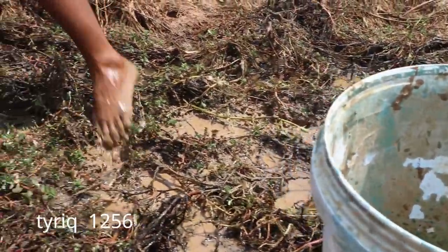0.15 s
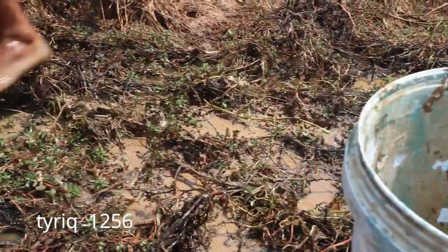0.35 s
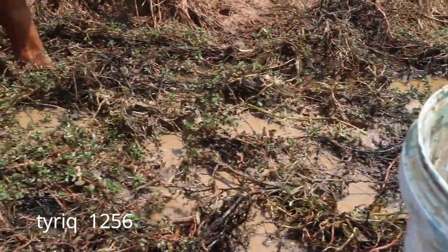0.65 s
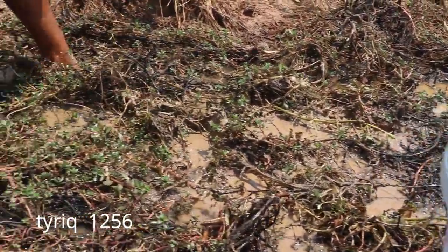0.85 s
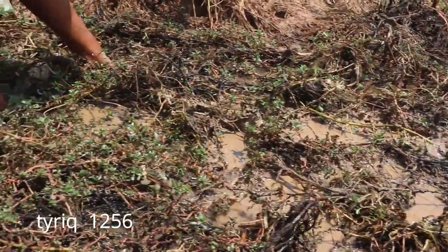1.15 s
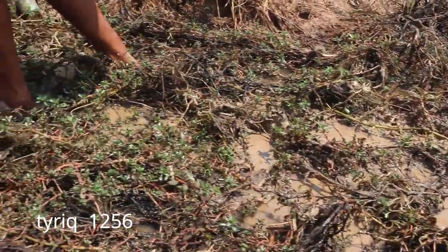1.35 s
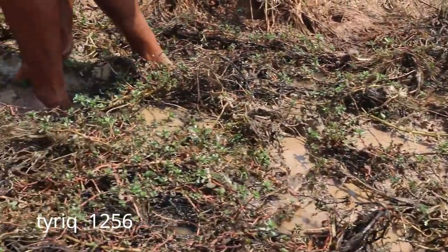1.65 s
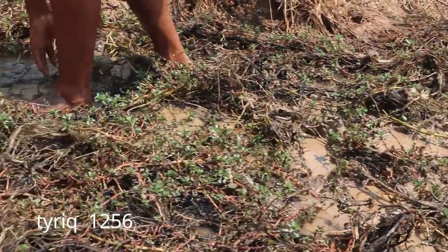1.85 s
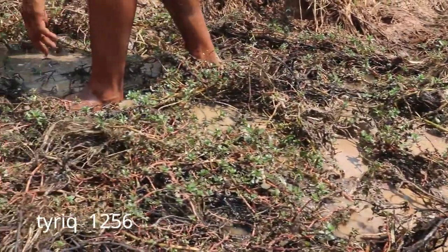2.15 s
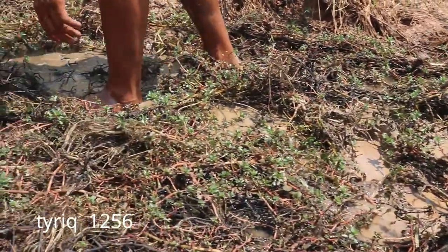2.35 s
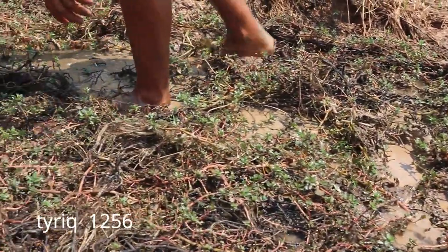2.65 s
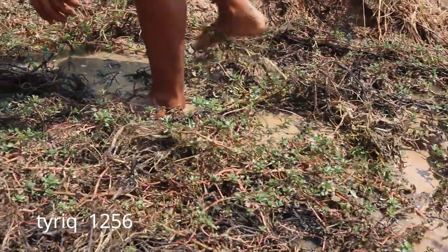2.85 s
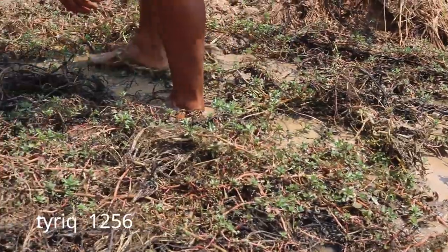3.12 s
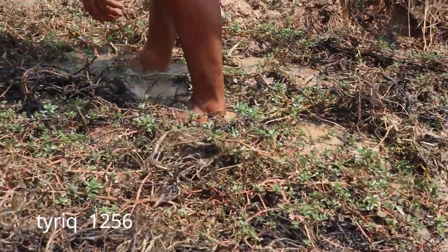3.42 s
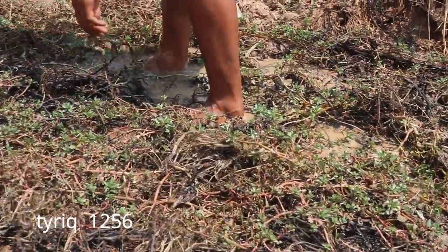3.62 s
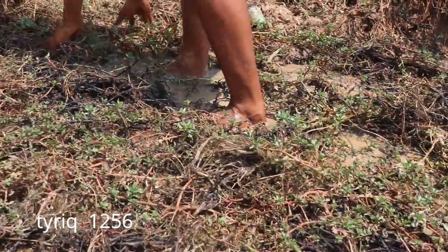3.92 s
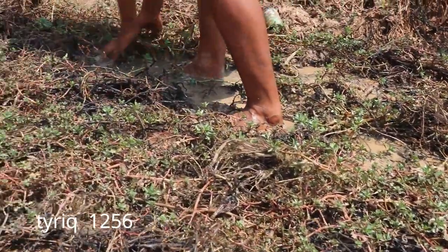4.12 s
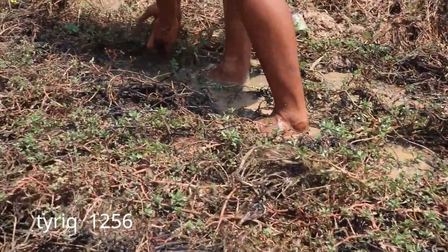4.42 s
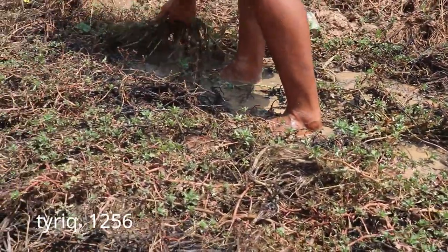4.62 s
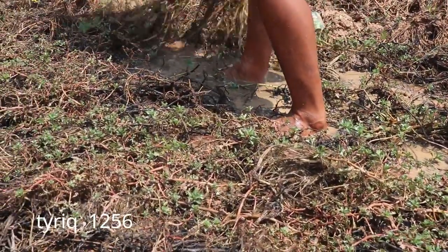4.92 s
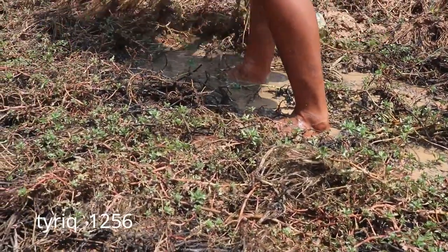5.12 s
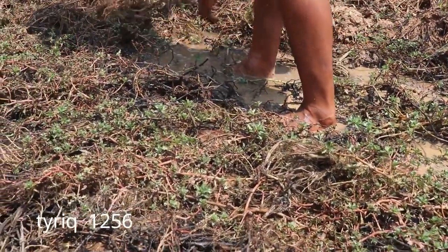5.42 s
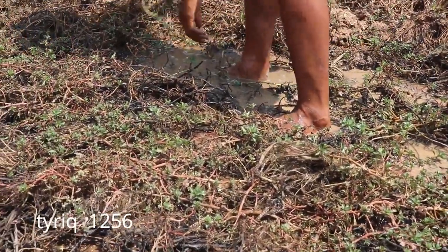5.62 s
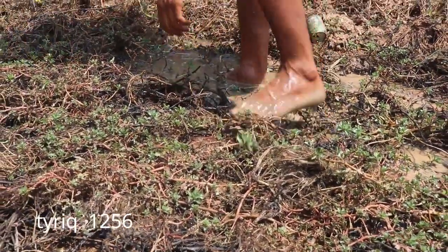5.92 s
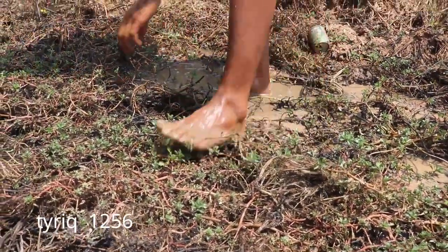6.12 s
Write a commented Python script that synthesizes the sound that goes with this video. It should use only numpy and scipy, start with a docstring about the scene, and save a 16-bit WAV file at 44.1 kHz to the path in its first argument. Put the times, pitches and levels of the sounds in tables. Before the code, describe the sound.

Bare feet wade through a shallow, weedy puddle in a field, close to the microphone. Each step crunches plants and sloshes water, with soft thuds in the mud and small gurgling bubbles. Past the middle, hands tear up weeds in a loud run of sharp cracks and rustling. A wet clump drops with a splat and one more step follows. Faint wind, hiss and distant insects lie underneath.

```python
"""Leaves rustle and water sloshes over faint wind, hiss and far insects as bare feet wade a weedy puddle.
Crushed weeds crunch, heels thud into the mud, and trapped air gurgles out as ringing bubbles.
Stems fracture in sharp cracks, loudest where hands tear them up; then a wet clump drops.
About two seconds in, wings buzz faintly for a moment."""
import sys
import numpy as np
from scipy import signal
from scipy.fft import rfft, irfft, next_fast_len
from scipy.io import wavfile
from scipy.ndimage import uniform_filter1d, map_coordinates

SR = 44100
rng = np.random.default_rng(int(sys.argv[2]) if len(sys.argv) > 2 else 0)


def store_pcm(level_fs):
    """Save levels as 16-bit WAV."""
    pcm = np.round(np.clip(level_fs, -1, 1) * 32767).astype(np.int16)
    wavfile.write(sys.argv[1], SR, np.atleast_2d(pcm).T)


N = 276507

# spectra of far hiss, wind and rubbed leaves: frequency_hz, density_db
HISS_SPECTRUM = [(180, -19), (300, -3), (399, -7), (441, -1), (479, -5.5), (1140, -9), (2090, -14),
                 (2730, 1.5), (3170, -13), (6290, -13), (16300, -24.5)]
WIND_SPECTRUM = [(12, -43), (20, -17), (49, -4.5), (88, -3), (114, -9.5), (161, -3.5), (500, -16),
                 (650, -28), (1100, -120)]
LEAF_SPECTRUM = [(710, -63), (1200, -46.5), (1560, -4.5), (1950, -4), (3080, -4.5), (4410, -2),
                 (10800, -9.5), (16000, -33)]
# left-right likeness of hiss and wind: frequency_hz, correlation (limited to -1..1 in use)
AIR_CORRELATION = [(60, 0.87), (180, 0.44), (550, 0.17), (1650, -1.22), (4970, -0.17), (15000, -0.16)]
# steady insect bands: pitch_hz, width_hz, first_db, last_db
INSECT_BANDS = [(2686, 130, -64, -68), (622, 197, -57, -67.5)]
# strength of the wind: time_s, level_db
WIND_LEVELS = [(0, -54), (.64, -53.5), (2.01, -57.5), (3.6, -57), (4.2, -57), (4.42, -60.5), (5.46, -61),
               (5.73, -55.5), (6.27, -56.5)]
# movements of a foot or hand: peak_s, rustle_db, slosh_db, swell_s, fade_s (both over 20 dB)
LIMB_MOVES = [(.02, -49.5, -48.5, 1, .3), (0.124, -38, -37, 0.12, 0.19), (.24, -48.5, -48.5, 0.3, .2),
              (.41, -53, -50, 0, 0), (.53, -46, -43, 0.07, .18), (.62, -41, -42, .06, .1),
              (.68, -47, -46, .05, .15), (.86, -44, -45.5, 0.22, 0.12), (.97, -52, -52.5, 0.2, .2),
              (1.16, -46.5, -48, 0.18, 0.23), (1.37, -43, -48.5, 0.14, 0.26), (1.56, -40, -40.5, 0.32, 0.4),
              (1.78, -51, -49.5, 0.1, 0.27), (2.62, -48, -48.5, 0.02, .5), (2.74, -45, -57, .2, .35),
              (2.739, -43.5, -31, .14, .045), (3.17, -44.5, -51, 0.17, 0.23), (3.31, -60, -52, .4, 0.3),
              (3.62, -63.5, -57, 0.5, .4), (4.05, -51.5, -65, .5, .1), (4.12, -39, -46, 0.06, .5),
              (4.24, -48, -40.5, .15, .25), (4.42, -47, -45.5, 0.28, 0.3), (4.53, -57, -38.5, 0.1, 0.07),
              (4.76, -36.5, -42.5, 0.13, 0.14), (4.86, -35, -51, 0.11, .12), (4.96, -34, -49, 0.1, .15),
              (5.31, -40.5, -56, 0.6, 0.06), (5.66, -44.5, -52, 0.2, .16), (5.815, -41, -29.5, 0.01, .028),
              (5.93, -51, -53, .25, 0.5), (6.27, -32.5, -43, 0.0662, .2)]
# weeds crushed by a foot or the clump: start_s, level_db, squelch_offset_db, pan_db, length_s, squelch_hz
WEED_CRUNCHES = [(0.045, -24.5, -11, -8.5, 0.022, 2700), (0.0974, -29.5, 4, -20, 0.039, 2370),
                 (0.123, -26, 9.5, -16, 0.0083, 3050), (0.144, -38, 7, -12, 0.012, 2520),
                 (0.1844, -15.5, -12, -2, 0.02, 1380), (0.399, -29, -3, -13, 0.017, 2800),
                 (0.411, -31.5, -4.5, -2, 0.019, 663), (0.521, -20.5, -8, -12.5, 0.024, 1570),
                 (0.55, -23, -8.5, -11, 0.015, 590), (0.6047, -14.5, -27, 12, 0.025, 1520),
                 (0.669, -20, -8, -8, 0.018, 650), (0.829, -31, 2, -21, 0.025, 1710),
                 (0.862, -23.5, -1.5, -14, 0.017, 1800), (1.111, -21, -15, 6.5, 0.018, 2060),
                 (1.142, -21, -15, 12, 0.04, 1620), (2.608, -26.5, 0, 3, 0.02, 2360),
                 (2.7327, -27, -22, -1, 0.01, 670), (2.766, -26, 2, 0.5, 0.0078, 2430),
                 (3.125, -22.5, -18, 3.5, 0.026, 3070), (3.1554, -21, -30, 6, 0.025, 2320),
                 (4.105, -22, -29, 14, 0.039, 1480), (5.798, -23.5, 6, -7, 0.024, 1520),
                 (5.805, -9, -3, 7, 0.013, 960), (5.814, -7.5, -7.5, 0.5, 0.018, 560),
                 (6.201, -23, -12, 1, 0.032, 3280), (6.233, -27, 2, -3, 0.056, 2030)]
# heels sinking into mud: start_s, level_db, pitch_hz
HEEL_THUDS = [(.063, -35, 218), (.123, -40, 156), (.194, -41, 207), (.403, -47, 140), (.541, -31.5, 208),
              (.815, -42.5, 164), (.991, -41, 223), (4.527, -46, 200), (5.801, -36.5, 128),
              (5.815, -33.5, 253)]
# large air pockets: start_s, level_db, pitch_hz, pan_db, t60_s
AIR_POCKETS = [(.123, -22, 3150, -16, 0.034), (.152, -24, 2620, -13, 0.046), (.164, -19.5, 910, -1, .029),
               (.196, -15.5, 1400, -.5, 0.025), (.501, -17, 3710, -21, 0.013), (.615, -18, 1510, .5, 0.033),
               (1.434, -35, 2240, 3, .04), (1.466, -31.5, 1280, -5, .054), (1.494, -29, 950, 2, .037),
               (1.507, -23, 1166, 6, .054), (1.534, -17.5, 1544, 10, .025), (1.544, -25, 1570, -10, .04),
               (1.591, -28.5, 784, 2, 0.083), (1.619, -22, 1220, 5, 0.033), (1.656, -24.5, 1320, 2, .042),
               (1.675, -24, 960, 4, .041), (1.711, -31, 1920, 0, .032), (1.744, -27, 1590, 3.5, 0.025),
               (1.776, -32, 1370, 0, .032), (2.636, -26.5, 447, -1, 0.045), (2.639, -21.5, 2400, -5, 0.044),
               (2.648, -29.5, 1180, -2, .071), (2.66, -36, 500, -2, .1), (2.677, -10.5, 1470, -2, .018),
               (2.697, -6, 1456, -4, .016), (2.709, -20, 635, 2, .019), (2.726, -19.5, 618, 2, 0.037),
               (2.739, -15.5, 626, 2.5, 0.044), (2.75, -25.5, 2300, -5, 0.075),
               (3.193, -23.5, 590, 1, 0.038), (3.217, -29.5, 1730, .5, .037), (3.27, -25.5, 572, 1, 0.078),
               (3.279, -30.5, 2720, 0, .04), (3.674, -37, 1074, .5, .04), (4.129, -28, 1900, -3, .035),
               (4.21, -31.5, 505, 0, 0.13), (4.228, -24, 950, 1, .03), (4.231, -24, 1600, 1, 0.038),
               (4.852, -21, 1800, -2, .03), (5.207, -28, 2610, -7, .043), (5.91, -28, 1800, -7, .055)]
# hollows filling with water: start_s, level_db, pitch_hz, pan_db, t60_s
FILLING_HOLLOWS = [(2.83, -34, 903, -4, 0.053), (3.288, -39, 646, 0, .32)]
# breaking stems and droplet ticks, thick wet stems lowest: start_s, level_db, pitch_hz, pan_db
STEM_SNAPS = [(.1881, -15.5, 3930, -6), (0.2971, -20, 4360, 5), (0.5023, -22.5, 6500, -10),
              (.556, -24.5, 2630, -15), (.597, -19.5, 8400, 14), (0.6732, -21.5, 2200, -10),
              (.8035, -29.5, 6960, -12.5), (0.8715, -22, 2260, -13), (.9737, -14.5, 3200, 8),
              (.9739, -22.5, 1400, 0), (1.1178, -21.5, 6640, 11), (1.1526, -19.5, 2150, 9),
              (1.1572, -23, 2150, 6), (1.306, -28, 3200, 3), (1.3449, -24, 4740, 8.5),
              (1.4136, -29.5, 6000, 10), (2.5861, -30, 9300, 7.5), (2.612, -18, 2540, -4),
              (2.7332, -5, 4130, 2), (2.767, -21.5, 5000, 2), (2.805, -28, 8660, 0), (2.818, -26, 4700, 0),
              (2.86, -30, 3320, -2), (2.8665, -26.5, 4600, 0), (3.1571, -25.5, 2710, -5),
              (3.1951, -27, 1520, -2), (3.4163, -30, 2970, -1), (3.471, -30.5, 6340, 4),
              (3.726, -30, 6200, 2), (4.0977, -24.5, 6540, 18), (4.11, -20.5, 4220, 9),
              (4.1324, -27, 7450, 11), (4.1392, -24, 4160, 13), (4.159, -24.5, 4860, 17),
              (4.193, -25, 4650, 10), (4.2285, -23.5, 5200, 16), (4.2872, -24, 4600, 4),
              (4.3762, -20.5, 2420, 1), (4.3766, -27, 900, 0), (4.4057, -24.5, 1900, -1),
              (4.437, -21, 6800, 1), (4.4533, -8, 6950, 1), (4.4535, -12.5, 1500, 0.5),
              (4.4829, -20, 4520, 0), (4.483, -27, 1300, 0), (4.4975, -22, 5300, 11),
              (4.518, -9.5, 2550, -2.5), (4.5182, -13, 1310, 0), (4.5282, 1.5, 4560, 1.5),
              (4.549, -5, 5800, 2.5), (4.592, -4, 3770, -.5), (4.5921, -19, 1430, -1.5),
              (4.651, -24.5, 3230, 0), (4.7119, 0, 4720, 3.5), (4.7315, -5, 6200, 5.5),
              (4.7432, -10, 5760, 0), (4.7514, -20, 4180, 2), (4.7615, -3, 6100, 3),
              (4.7765, -13.5, 4960, 4), (4.79, -22, 4350, 0), (4.8076, -1.5, 6640, 1.5),
              (4.834, 0, 6900, 11.5), (4.8513, -7, 2390, -1), (4.8558, -5, 5800, 1),
              (4.8727, -2.5, 5540, 2), (4.8878, -11.5, 5000, -1), (4.9111, -12, 6330, 9.5),
              (4.9203, -16, 6930, 0), (4.9357, 2, 5100, 1.5), (4.9453, -21, 2630, -6), (4.9495, 3, 6130, 2),
              (4.9541, -12, 5940, 2), (4.9602, -13, 5810, 2), (4.9777, -8, 5000, 2), (4.9848, -7, 4900, 5),
              (4.9951, -13.5, 4160, 1), (5.0106, -15.5, 9220, 10), (5.0157, -17, 5730, 3),
              (5.054, 0, 7750, 9), (5.0655, -1, 5300, 4), (5.0882, -12, 6430, -3), (5.106, -15.5, 10300, 9),
              (5.1529, -6.5, 7100, 9.5), (5.1933, -21, 7240, 9.5), (5.2155, -6.5, 8700, 7),
              (5.2347, -1, 5540, 2.5), (5.2653, -5.5, 7550, 3), (5.638, -29, 2600, 0),
              (5.672, -33, 1400, 0), (5.704, -25.5, 8100, 8.5), (5.807, -8, 3700, -1),
              (5.8072, -12.5, 980, 0), (5.827, -15.5, 2450, -5.5), (5.9122, -24.5, 2350, -4.5),
              (5.9311, -19.5, 3800, 1.5), (5.9826, -22, 3160, -4), (6.0137, -23.5, 4530, 1),
              (6.0551, -18, 4960, 1.5), (6.2034, -18.5, 7600, 2), (6.25, -21, 2290, -5),
              (6.2535, -15.5, 4690, 1), (6.2593, -10, 4000, -2)]

HISS_DB = -52
IDLE_RUSTLE_DB, IDLE_SLOSH_DB = -60, -60.5  # standing limbs still shift a little
SHAKE_OFFSET_DB, SHAKE_T60_S, SHAKE_HIGHPASS_HZ = -36.5, .2, 3770  # dry leaves shaken by a snap
POCKET_RISE_HZ_PER_S, HOLLOW_RISE_HZ_PER_S = 2750, 24000
KNOCK_DB, KNOCK_DB_PER_SNAP_DB = -25, .55  # the dull knock under a snap
BAND_LIMIT_HZ = 16200


def amp(db):
    """Amplitude ratio of a level: tenfold for each 20 dB."""
    return 10 ** (np.asarray(db) / 20)


def unit(x):
    """Normalisation to rms 1."""
    return x / np.sqrt(np.mean(x ** 2) + 1e-20)


def along(points, hz):
    """Interpolation of (Hz, value) points on a logarithmic frequency axis."""
    frequencies, values = np.transpose(points)
    return np.interp(np.log(hz + 1), np.log(frequencies + 1), values)


def curves(rows):
    """Linear interpolation, sample by sample, of each column after the time."""
    times, *columns = np.transpose(rows)
    return [np.interp(np.arange(N) / SR, times, column) for column in columns]


def wobble(rate_hz):
    """Slow random modulation: a spline through Gaussian knots."""
    knots = rng.standard_normal(int(N * rate_hz / SR) + 4)
    return map_coordinates(knots, [np.arange(N) * rate_hz / SR])


def filtered(x, response):
    """Linear filtering: the spectrum is multiplied by a frequency response."""
    size = next_fast_len(x.shape[-1] + 8192)
    return irfft(rfft(x, size) * response(np.fft.rfftfreq(size, 1 / SR)), size)[..., :x.shape[-1]]


def band(hz, centre_hz, octaves):
    """Band-pass response, falling to half amplitude at the given octaves either side."""
    return 1 / (1 + (np.log2(hz / centre_hz + 1e-6) / octaves) ** 4)


def stereo_noise(response, correlation):
    """Coloured noise of rms 1; the balance of mid and side sets its left-right correlation."""
    angle = lambda hz: np.arccos(np.clip(along(correlation, hz), -1, 1)) / 2
    white = rng.standard_normal((2, N))
    mid, side = filtered(white, lambda hz: response(hz) * [np.cos(angle(hz)), np.sin(angle(hz))])
    return unit(np.array([mid + side, mid - side]))


def patchy(x, depth_db, bins):
    """Random amplitude modulation in small patches of time and frequency, at rms 1."""
    spectra = signal.stft(x, nperseg=128)[2]
    spots = uniform_filter1d(rng.standard_normal(spectra.shape[-2:]), bins, axis=0)
    spots = uniform_filter1d(spots, 3, axis=1)
    return unit(signal.istft(spectra * amp(depth_db * unit(spots)), nperseg=128)[1][..., :x.shape[-1]])


def grains(count, hz, octaves, decay_cycles, spread_db, pan_db, samples):
    """Superposition of damped, slightly rising sines at random times and sides, at rms 1."""
    onset, strength = rng.random((count, 2)).T[..., None]
    detune, side = rng.standard_normal((count, 2)).T[..., None]
    pitch_hz = np.clip(hz * 2 ** (octaves * detune), 300, SR / 3)
    cycles = pitch_hz * np.arange(samples) / SR
    age = cycles / decay_cycles
    waves = np.sin(2 * np.pi * cycles * (1 + .025 * age)) * np.exp(-age)
    waves *= amp(-spread_db * np.log(strength))
    at = ((onset * N).astype(int) + np.arange(samples)).ravel()
    channels = [np.bincount(at, (waves * amp(half * pan_db * side)).ravel(), N) for half in (.5, -.5)]
    return unit(np.array([channel[:N] for channel in channels]))


def add(out, start_s, sound, pan_db):
    """Mix a sound in, placed by level difference: pan_db is left minus right."""
    part = out[:, round(start_s * SR):][:, :np.shape(sound)[-1]]
    part += (sound * amp([[pan_db / 2], [-pan_db / 2]]))[:, :part.shape[1]]


def open_air():
    """Slowly modulated noise: broadband for far hiss, narrowband for insects, low for wind."""
    level = amp(HISS_DB + .64 * wobble(3.84))
    hiss = level * stereo_noise(lambda f: amp(along(HISS_SPECTRUM, f)), AIR_CORRELATION)
    insects = np.zeros((2, N))
    for hz, width_hz, first_db, last_db in INSECT_BANDS:
        level = amp(np.linspace(first_db, last_db, N) + 2.5 * wobble(8))
        insects += level * stereo_noise(lambda f: 1 / (1 + ((f - hz) / width_hz * 2) ** 2), [(hz, .7)])
    gusts = amp(curves(WIND_LEVELS)[0] + .69 * wobble(7.3))
    wind = gusts * stereo_noise(lambda f: amp(along(WIND_SPECTRUM, f)), AIR_CORRELATION)
    return hiss + insects + wind


def stirring_gains():
    """Incoherent sources add in power, giving the envelopes of rustle, slosh and shaken leaves."""
    t = np.arange(0, N / SR + .002, .002)
    power = amp([[IDLE_RUSTLE_DB], [IDLE_SLOSH_DB]]) ** 2 * np.ones(len(t))
    for peak_s, rustle_db, slosh_db, swell_s, fade_s in LIMB_MOVES:
        drop_db = 20 * np.maximum((peak_s - t) / swell_s, (t - peak_s) / fade_s)
        power += amp([[rustle_db], [slosh_db]] - drop_db) ** 2
    shake_power = np.zeros(len(t))
    for start_s, level_db, _, _ in STEM_SNAPS:
        drop_db = 60 * abs(t - start_s) / SHAKE_T60_S
        shake_power += (t > start_s) * amp(level_db + SHAKE_OFFSET_DB - drop_db) ** 2
    return curves(np.transpose([t, *np.sqrt(power), np.sqrt(shake_power)]))


def stirring():
    """Friction, impact and resonance: limbs brush leaves, shed droplets and churn up small bubbles."""
    rustle, slosh, shake = stirring_gains()
    droplets = grains(3000, hz=5200, octaves=.55, decay_cycles=8, spread_db=2.5, pan_db=6, samples=320)
    friction = stereo_noise(lambda f: amp(along(LEAF_SPECTRUM, f)), [(2000, .12), (12000, .034)])
    friction = patchy(friction, depth_db=5.5, bins=10)
    bubbles = grains(7000, hz=1700, octaves=.6, decay_cycles=3.5, spread_db=1.8, pan_db=7, samples=500)
    leaves = unit(.68 * droplets + friction)
    other_leaves = np.roll(leaves, SR, axis=1)  # a 1 s shift decorrelates them
    dry_leaves = unit(filtered(other_leaves, lambda f: 1 / (1 + (SHAKE_HIGHPASS_HZ / (f + 1)) ** 4)))
    return rustle * leaves + slosh * bubbles + shake * dry_leaves


def weed_crunches():
    """Dense tiny fractures merge into a burst of noise, joined by a band of wet squelch."""
    out, t = np.zeros((2, N)), np.arange(SR // 8) / SR
    for start_s, level_db, squelch_offset_db, pan_db, length_s, squelch_hz in WEED_CRUNCHES:
        swell = (1 - np.exp(-t / .0036)) * np.exp(-(t / length_s) ** 3)
        mid, side, wet = rng.standard_normal((3, len(t)))
        noise = np.array([mid + .9 * side, mid - .9 * side])
        grit = patchy(filtered(noise, lambda f: amp(along(LEAF_SPECTRUM, f))), depth_db=3.5, bins=8)
        squelch = patchy(filtered(wet, lambda f: band(f, squelch_hz, octaves=.6)), depth_db=3, bins=1)
        add(out, start_s, amp(level_db - 15.5) * swell * grit, pan_db)
        add(out, start_s, amp(level_db + squelch_offset_db - 10) * swell * squelch, .55 * pan_db)
    return out


def heel_thuds():
    """Heavy damping: a heel's soft push into mud dies within a few low cycles."""
    out, t = np.zeros((2, N)), np.arange(SR // 10) / SR
    for start_s, level_db, pitch_hz in HEEL_THUDS:
        age = t * pitch_hz / 1.16  # the envelope peaks at age 1
        add(out, start_s, amp(level_db) * age * np.exp(1 - age) * np.sin(2 * np.pi * pitch_hz * t), 0)
    return out


def gurgles():
    """Resonance of trapped air: the pitch climbs as a bubble nears the surface or a hollow fills."""
    out, t = np.zeros((2, N)), np.arange(SR // 17) / SR
    window = (1 - np.exp(-t / .0024)) * np.clip((t[-1] - t) / .015, 0, 1)
    for rows, rise in ((AIR_POCKETS, POCKET_RISE_HZ_PER_S), (FILLING_HOLLOWS, HOLLOW_RISE_HZ_PER_S)):
        for start_s, level_db, pitch_hz, pan_db, t60_s in rows:
            waver = np.interp(t, np.linspace(0, t[-1], 24), rng.standard_normal(24))
            phase = 2 * np.pi * np.cumsum(pitch_hz * (1 + .075 * waver) + rise * t) / SR
            add(out, start_s, amp(level_db - 60 * t / t60_s) * window * np.sin(phase), pan_db)
    return out


def stem_snaps():
    """Fracture radiates a brief pulse over a dull knock; nearby weeds scatter it for a few ms."""
    out, t = np.zeros((2, N)), np.arange(SR // 25) / SR
    scatter_decay = amp(-11 - 60 * t / .009) + amp(-26 - 60 * t / .035)
    scatter_envelope = np.clip((t - .0003) / .0004, 0, 1) * scatter_decay
    knock = np.sin(2 * np.pi * 1500 * t) * np.exp(-t / .00073) * (1 - np.exp(-t / .00029))
    for start_s, level_db, pitch_hz, pan_db in STEM_SNAPS:
        lead_s = 1.2e-5 * pan_db * np.array([[.5], [-.5]])  # the louder side hears it first
        age_s = np.maximum(t - .0002 + lead_s, 0)
        cycles = pitch_hz * age_s
        envelope = np.exp(-(cycles / 1.49) ** 1.4) * (1 - np.exp(-cycles / .52))
        crack = envelope * np.sin(2 * np.pi * cycles)
        crack += .094 * np.sin(2 * np.pi * 12500 * age_s) * np.exp(-age_s / .00018)  # fibres part
        knock_db = KNOCK_DB + KNOCK_DB_PER_SNAP_DB * level_db + rng.normal(0, 4)
        colour = lambda f: band(f, pitch_hz, octaves=1.19) / (1 + (f / 10500) ** 6)
        mid, side = unit(filtered(rng.standard_normal((2, len(t))), colour))
        scatter = scatter_envelope * np.array([mid + .5 * side, mid - .5 * side])
        add(out, start_s - .0003, amp(level_db) * (1.74 * crack + scatter), pan_db)
        add(out, start_s, amp(knock_db) * knock, 0)
    return out


def wing_buzz(centre_s=1.98, half_length_s=.045, pitch_hz=281, level_db=-55):
    """Periodic wing beats, perhaps a fly's, give a harmonic series that swells and fades."""
    t = np.arange(N) / SR - centre_s
    harmonics = sum(np.sin(2 * np.pi * k * pitch_hz * t) * amp(-7 * (k > 1)) for k in range(1, 9))
    return amp(level_db) * np.exp(-(t / half_length_s) ** 2) * harmonics


def overload_thump(start_s=4.9356, gain_db=-20):
    """A short, one-sided low thump where one of the loudest cracks overloads and clips."""
    out, t = np.zeros((2, N)), np.arange(SR // 25) / SR
    pulse = np.exp(-t / .00061) * (1 - np.exp(-t / .00017))
    add(out, start_s, amp(gain_db) * pulse, 0)
    return out


def scene():
    """Superposition: all the sounds add linearly."""
    transients = stem_snaps() + overload_thump() + weed_crunches() + gurgles() + heel_thuds()
    return transients + stirring() + wing_buzz() + open_air()


def record(dry):
    """Clipping flattens the loudest cracks; a low-pass removes all above the band limit."""
    return filtered(np.clip(dry, -.95, .95), lambda hz: hz < BAND_LIMIT_HZ)


dry = scene()
out = record(dry)
store_pcm(out)
```